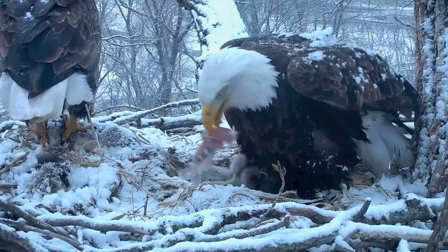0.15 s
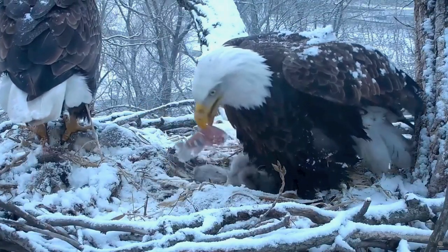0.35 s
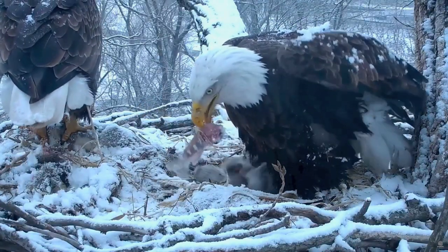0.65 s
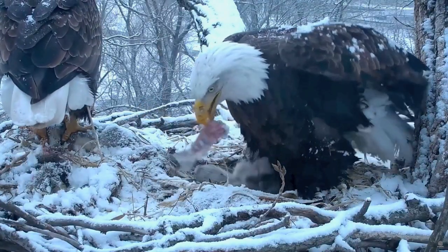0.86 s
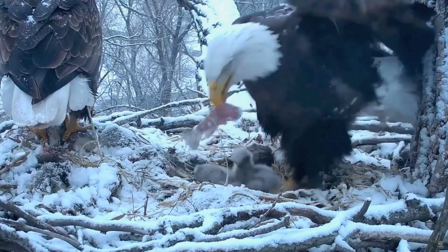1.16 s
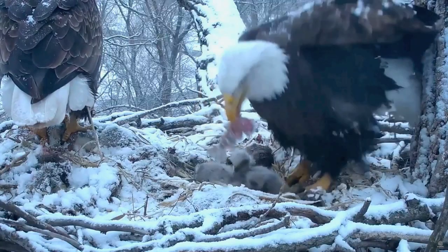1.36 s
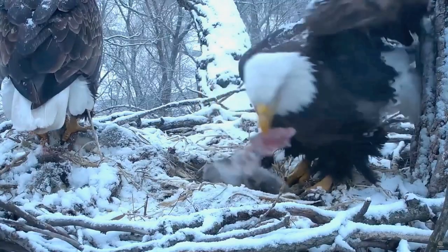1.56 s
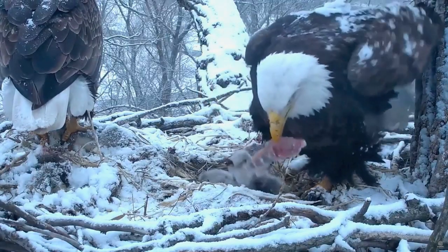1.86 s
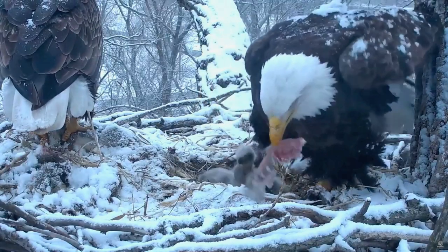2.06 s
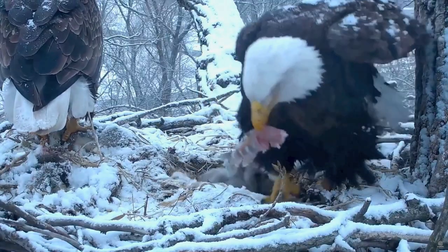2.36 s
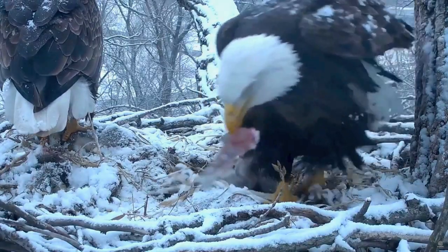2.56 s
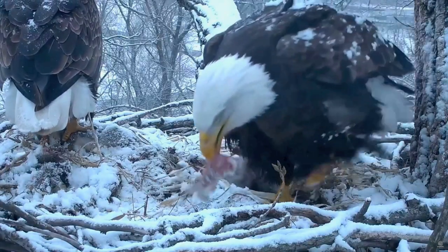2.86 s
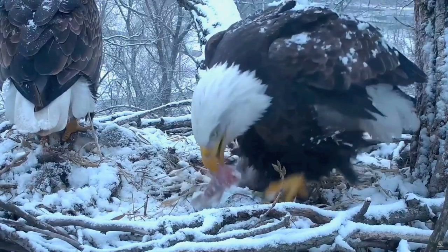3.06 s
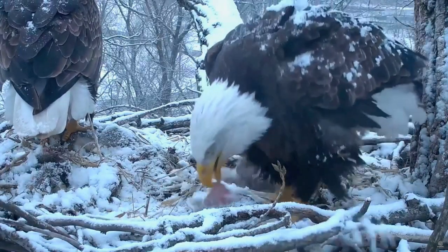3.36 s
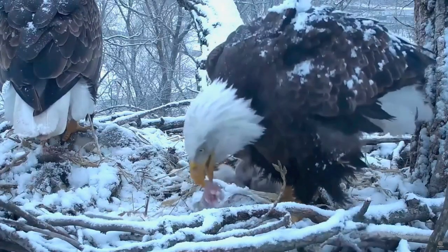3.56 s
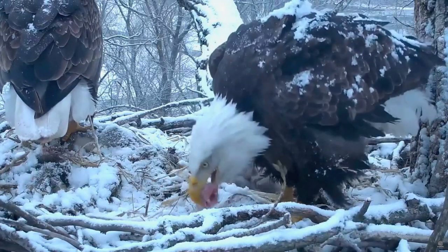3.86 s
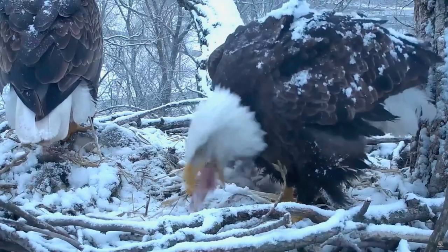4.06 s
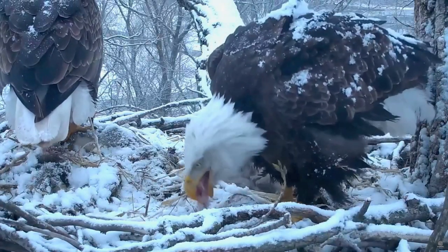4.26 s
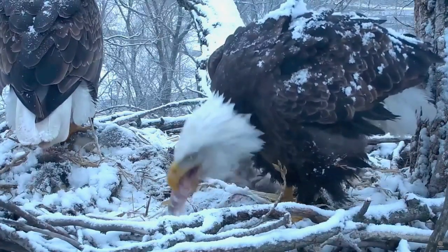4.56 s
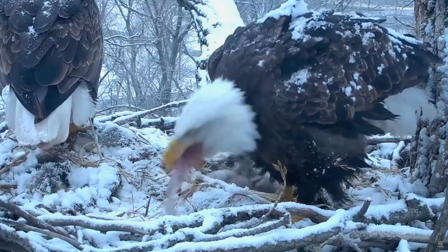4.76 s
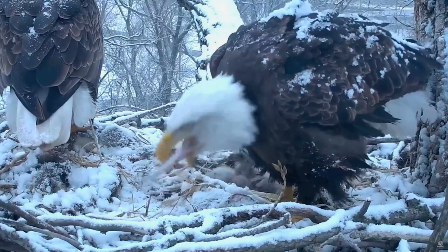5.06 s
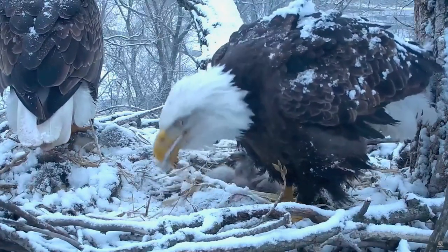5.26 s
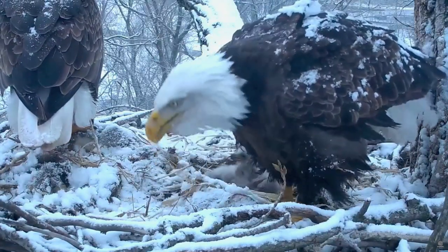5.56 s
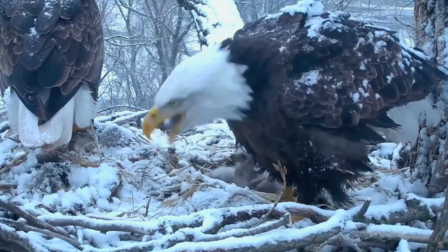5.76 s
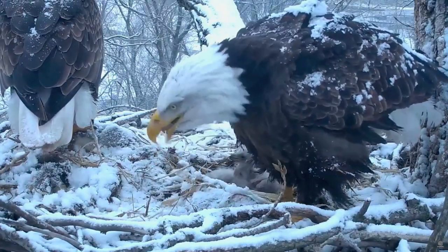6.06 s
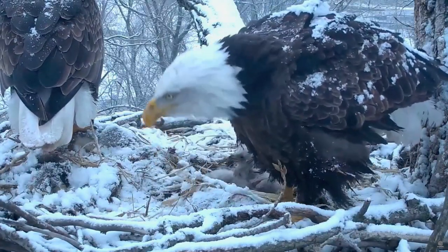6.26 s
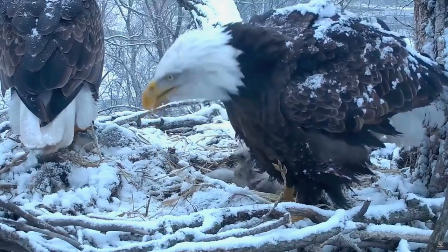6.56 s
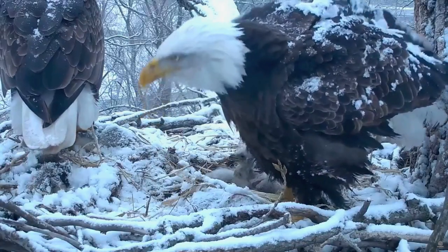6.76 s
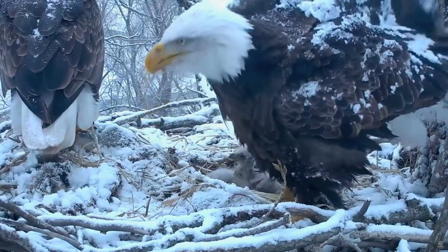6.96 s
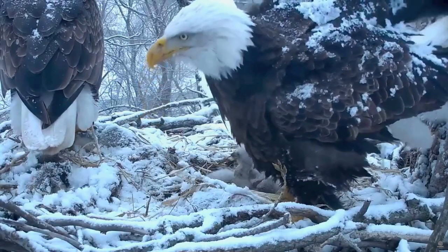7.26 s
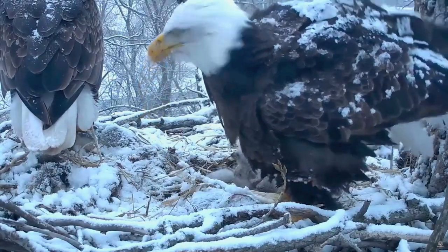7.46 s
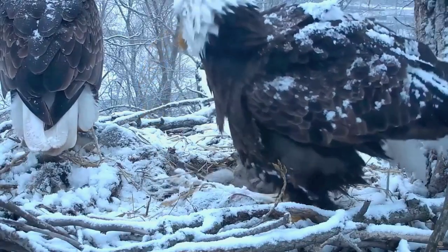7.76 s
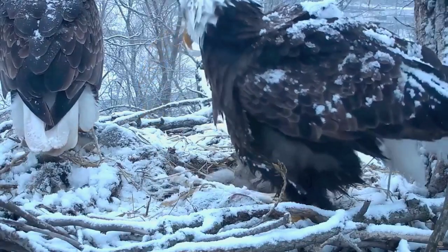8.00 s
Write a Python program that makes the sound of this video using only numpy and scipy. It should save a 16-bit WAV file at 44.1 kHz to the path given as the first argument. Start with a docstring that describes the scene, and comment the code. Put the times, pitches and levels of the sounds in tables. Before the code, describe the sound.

At an outdoor eagle nest, a run of faint thin peeps leads into a loud chitter of sharp, high chirps. Sticks and straw rustle softly as an adult steps about and tugs at food, among scattered chirps and short squeals. The nest quietens, then chirps and rustling pick up at the end. A small, close microphone adds a low hum and hollow hiss throughout.

```python
"""Bald eagles at a snowy nest, heard from close by through a small outdoor camera microphone.
A run of thin peeps comes first, then a loud chitter of sharp chips. An adult steps over the sticks and
tears food among scattered chips and squeals; the nest quietens, and chips and rustle pick up at the end.
All along the microphone adds mains hum and a hollow hiss; its 8 kHz sampling mirrors calls about 4 kHz."""
import sys
import numpy as np
from scipy import signal
from scipy.fft import rfft, irfft, next_fast_len
from scipy.io import wavfile
from scipy.ndimage import uniform_filter1d

SR = 44100
rng = np.random.default_rng(int(sys.argv[2]) if len(sys.argv) > 2 else 0)


def master(y):
    """Save y as 16-bit WAV."""
    cut = np.clip(np.atleast_2d(y).T, -1, 1)
    pcm = np.round(cut * 32767)  # scale
    wavfile.write(sys.argv[1], SR, pcm.astype(np.int16))


N = 358533
TIME = np.arange(N) / SR

# sharp chips: (peak time [s], relative level [dB], swell [s], closing pitch [Hz])
CHIPS = [ (0.7282, -24, 0.0042, 2940), (0.8205, -20.5, 0.0036, 3066), (0.9220, -22, 0.008, 3050),
         (1.0291, -21.5, 0.0068, 3134), (1.1222, -23, 0.0052, 3226), (1.2246, -27.5, 0.0063, 3250),
         (1.31, -37.5, 0.0059, 3245), (1.7597, -25, .0014, 2900), (1.9625, -31, 0.0016, 2860),
         (1.9856, -37.5, 0.0031, 3420), (2.2440, -28.5, 0.0025, 3005), (2.4152, -25.5, 0.005, 3150),
         (3.7620, -52.5, 0.0022, 5020), (4.031, -47.5, 0.0021, 3300), (4.1370, -51, 0.0028, 4790),
         (4.5200, -36.5, 0.004, 3000), (4.7286, -22, .0018, 3084), (4.7322, -30, 0.0029, 2200),
         (4.752, -35, 0.0018, 3170), (5.4590, -43, .0020, 2930), (6.1627, -35.5, .0018, 2980),
         (7.5010, -33.5, .0024, 3030), (7.6674, -31, 0.0023, 3000), (7.7590, -47, 0.0023, 3100),
         (7.814, -32.5, 0.0032, 2940), (7.9586, -32.5, 0.0045, 2930)]
# held squeals: (start [s], length [s], relative level [dB], pitch [Hz], glide [Hz], roughness [0-1])
SQUEALS = [ (.015, 0.049, -54, 4940, 0, 0.4), (.507, 0.028, -51.5, 3490, -120, 0.33),
           (.623, 0.041, -48.5, 3260, -320, 0.23), (1.003, .010, -37.5, 3290, -140, .38),
           (1.193, .028, -40, 3355, 306, .86), (1.880, 0.032, -44.5, 3180, 100, 0.53),
           (1.883, 0.016, -43.5, 1886, -30, 0.2), (1.991, 0.067, -48.5, 3090, 4, 0.45),
           (2.059, .03, -45, 3100, -450, 0.78), (2.36, 0.037, -51, 3020, 27, .54),
           (2.602, 0.034, -53.5, 5210, -160, 0.43), (2.798, 0.049, -53, 4910, 7, 0.12),
           (2.868, .035, -58, 5190, -130, 0.2), (4.32, 0.037, -62, 4840, -110, .2),
           (4.551, 0.013, -59.5, 3850, 220, 0.5), (4.58, .04, -60, 4700, 83, 0.1),
           (5.193, 0.036, -52, 2517, -140, 0.23), (5.457, 0.021, -47.5, 3080, 2, .28),
           (6.151, 0.034, -42.5, 3116, -110, 0.33), (6.497, 0.012, -41.5, 3060, -60, .3),
           (6.528, .013, -61, 3860, -350, .3), (7.042, .03, -51.5, 3110, 17, .12),
           (7.692, 0.039, -55, 3170, -17, 0.53), (7.812, 0.014, -45.5, 3238, -300, 0.82),
           (7.959, .045, -54.5, 3150, 90, 0.54), (8.053, 0.037, -58, 3200, 25, .58)]
# steps and tugs at the food: (peak time [s], level [dB], rise [s], fall [s])
MOVEMENTS = [ (1.2, -61.5, .22, 0.13), (2.08, -56, 0.19, .38), (3.12, -63.5, 0.12, 0.1),
             (3.38, -59, 0.026, 0.032), (4.1, -69.5, 0.11, 0.083), (4.82, -81, .08, .15),
             (5.38, -72.5, 0.068, 0.22), (7.73, -61, .1, 0.067), (8.13, -66.5, 0.16, .2)]
# colour of the rustling sticks: (frequency [Hz], gain [dB])
STICK_COLOUR = [(1300, -9), (2000, 1), (2600, -1.5), (3100, 3.5), (3550, 1), (3950, -22), (4400, -31.5)]
# swell of the background air: (time [s], relative level [dB])
AIR_LEVEL = [(0.0, -56.5), (0.54, -59.5), (0.74, -56.5), (0.9, -56.5), (1.33, -55.5), (1.61, -58.5),
             (1.74, -58.5), (2.06, -56), (2.76, -58.5), (3.01, -58), (3.78, -63), (4.71, -60), (5.46, -60),
             (5.86, -64), (6.43, -61.5), (7.4, -62.5), (7.83, -58), (8.13, -59.5)]
# four bands of air and microphone noise, low to high: (frequency [Hz], gain [dB])
RUMBLE_COLOUR = [(15, -68), (25, -39), (64, -17), (92, -21), (125, -10), (172, -3), (213, -13.5),
                 (243, -0.5), (289, 2), (309, 2), (339, -22), (377, -6.5), (425, -13), (498, -22.5),
                 (600, -24.5), (780, -50), (1320, -120)]
HOLLOW_COLOUR = [(330, -42.5), (560, -5.5), (601, -21.5), (638, 2), (672, 9), (753, 3.5), (824, -6.5),
                 (921, 0), (1020, -22.5), (1200, -6), (1560, -51.5), (2640, -120)]
HISS_COLOUR = [(650, -53.5), (1100, -22.5), (1210, -14), (1290, -10), (1570, -1), (1680, -8), (2120, -10.5),
               (2320, -23.5), (2930, -18), (4200, -38), (5460, -76), (9240, -120)]
TREBLE_COLOUR = [(3500, -26), (5500, -2), (7000, -4.5), (10000, -7), (14000, -11.5)]
# mains harmonics: (frequency [Hz], rms level [dB])
MAINS_HARMONICS = [(120, -91), (180, -78.5), (300, -80), (420, -94), (660, -85), (780, -89), (900, -95)]
# peaks and notches of the microphone housing: (frequency [Hz], width [Hz], gain [dB])
HOUSING_MODES = [(1198, 95, -15.5), (1323, 36, 4), (1597, 35.6, 8.5), (1641, 22, -14.5), (1728, 35, 6.5),
                 (1814, 41, -20), (1872, 18, 8), (1988, 30, -11), (2214, 123, -14), (2465, 25.5, 9.5),
                 (2548, 123, -18), (2630, 27, -6), (2932, 24, 6.5), (3014, 26, -8), (3164, 38, 4),
                 (3313, 47, -5.5), (3200, 59, 3), (3637, 27, 10.5), (3670, 59, -4.5), (3830, 90, 6.5),
                 (4640, 55, 5)]
# strength of the sampling images, which dips once: (time [s], gain [dB])
IMAGE_LEVEL = [(0, -1), (.7, .5), (6.2, -1.5), (6.48, -5), (7.05, -3), (7.5, -2)]
# how much of the images gets out around 4 kHz and around 12 kHz: (frequency [Hz], gain [dB])
LOW_IMAGE_COLOUR = [(1500, -31), (2500, 9), (3050, -4), (3600, 1), (4200, -9), (4700, 1), (5000, -4),
                    (5500, -3), (6000, -30), (6500, -38.5)]
HIGH_IMAGE_COLOUR = [(10400, -36), (11000, -22.5), (11300, -28), (11850, -47), (12450, -24), (12850, -31),
                     (13500, -47)]


def chips(stop_s=0.0019, slide_hz=878, slide_swell_s=0.00523, jitter_hz=70, flutter_db=1.4):
    """Each chip starts abruptly, swells while its pitch slides down, then is choked off in milliseconds."""
    out, waver, flutter = np.zeros(N), drift(500), drift(400)
    for peak_s, db, swell_s, close_hz in CHIPS:
        t = np.arange(-2 * swell_s, 5 * stop_s, 1 / SR)
        now = int(peak_s * SR) + np.arange(len(t))
        onset = np.sin(np.pi / 2 * np.interp(t / swell_s, [-1.7, -.85], [0, 1])) ** 2
        envelope = onset / np.cosh(2 * t / np.where(t < 0, swell_s, stop_s))
        open_hz = close_hz + slide_hz * np.tanh(swell_s / slide_swell_s)   # longer swells fall further
        slide = np.interp(t, [-1.1 * swell_s, 0.44 * stop_s], [open_hz, close_hz])
        tone = whistle(slide + jitter_hz * waver[now])
        add(out, peak_s + t[0], from_db(db + flutter_db * flutter[now]) * envelope * tone)
    return out


def squeals(notes, jitter_hz=280, flutter_db=3.5):
    """Held whistles; in the hoarse ones the syrinx shakes in both pitch and strength."""
    out, waver, flutter = np.zeros(N), drift(215), drift(220)
    for start_s, length_s, db, hz, glide_hz, rough in notes:
        now = slice(int(start_s * SR), min(int((start_s + length_s) * SR), N))
        along = np.linspace(0, 1, now.stop - now.start)
        arch = np.abs(np.sin(np.pi * along)) ** np.clip(1 - rough, .3, 1)
        pitch = hz + glide_hz * along + rough * jitter_hz * waver[now]
        out[now] += arch * from_db(db + rough * flutter_db * flutter[now]) * whistle(pitch)
    return out


def rasp_notes(lead_s=.035, length_s=.034, rise_hz=278.6, rough=.7, min_gap_s=.06, max_gap_s=.12):
    """In a chitter, a softer, hoarse rising rasp leads into each chip that closely follows another."""
    return [(s - lead_s, length_s, db - 20, hz + 130, rise_hz, rough)
            for previous, (s, db, _, hz) in zip(CHIPS, CHIPS[1:])
            if min_gap_s < s - previous[0] < max_gap_s]


def peep_notes(first_s=.083, gap_s=.093, slowing_s=.005, length_s=.02, hz=4887, rise_hz=141, rough=.27):
    """Six thin, quiet peeps of one shape, in a run that slows a little."""
    k = np.arange(6)
    starts = first_s + k * gap_s + k * (k - 1) / 2 * slowing_s
    return [(s, length_s, -52, hz, rise_hz, rough) for s in starts]


def nest_echoes(calls, near_db=-9.5, near_t60=0.038, far_db=-10.5, far_t60=0.16):
    """Sticks and trunk scatter the calls at once; trees farther off return a faint longer tail."""
    t = TIME[:SR // 2]
    response = np.zeros(len(t))
    response[0] = 1   # straight path to the microphone
    for db, t60, first_s in [(near_db, near_t60, .002), (far_db, far_t60, .014)]:
        echoes = rng.standard_normal(len(t)) * from_db(-60 * t / t60) * (t > first_s)
        response += from_db(db) * echoes / np.linalg.norm(echoes)
    return signal.fftconvolve(calls, response)[:N]


def stirring(rest_db=-77.5):
    """Each step or tug builds and settles exponentially, adding power to straw that is never quite still."""
    moves = [from_db(db) * np.exp(-np.maximum((s - TIME) / rise_s, (TIME - s) / fall_s))
             for s, db, rise_s, fall_s in MOVEMENTS]
    return np.sqrt(from_db(rest_db) ** 2 + np.sum(np.square(moves), axis=0))


def rustle(crackles_per_s=6000, clump_db=4.0, twigs_per_s=120, twig_db=-12.5):
    """Dry straw gives way in a dense, soft crackle, with single twigs ticking out of it."""
    straw = rng.standard_normal(N) * (rng.random(N) < crackles_per_s / SR)
    straw *= from_db(clump_db * drift(19))
    twigs = rng.uniform(-0.99, 1, N) * (rng.random(N) < twigs_per_s / SR)
    crackle = rms_one(straw) + from_db(twig_db) * rms_one(twigs)
    return stirring() * rms_one(coloured(crackle, STICK_COLOUR))


def air(low_db=-67.3, hollow_db=-9.5, hiss_db=-1.0, treble_db=-25.0):
    """Outdoor air and microphone noise swell and sink together, the lows and the top less than the hiss."""
    air_db, = in_time(AIR_LEVEL)
    swing_db = air_db - air_db.mean()
    low = noise(RUMBLE_COLOUR) + from_db(hollow_db) * noise(HOLLOW_COLOUR)
    low *= from_db(low_db + 0.84 * swing_db)
    hiss = from_db(air_db + hiss_db) * noise(HISS_COLOUR)
    treble = from_db(air_db.mean() + 0.76 * swing_db + treble_db) * noise(TREBLE_COLOUR)
    return low + hiss + treble


def mains_hum():
    """The microphone picks up steady harmonics of the 60 Hz mains."""
    return sum(from_db(db) * np.sqrt(2) * np.sin(2 * np.pi * (hz * TIME + rng.random()))
               for hz, db in MAINS_HARMONICS)


def housing(x):
    """The small cavity in front of the microphone rings at some pitches and swallows others."""
    for hz, width_hz, db in HOUSING_MODES:
        x = x + (from_db(db) - 1) * resonate(x, hz, width_hz)
    return x


def from_db(db):
    """Decibels to gain."""
    return 10 ** (np.asarray(db) / 20)


def rms_one(x):
    """Scale to unit rms."""
    return x / np.sqrt(np.mean(x ** 2) + 1e-20)


def in_time(rows):
    """Each column of a curve at every sample."""
    s, *columns = np.transpose(rows)
    return [np.interp(TIME, s, column) for column in columns]


def add(out, start_s, sound):
    """Mix a sound in at a given time."""
    at = max(int(start_s * SR), 0)
    out[at:at + len(sound)] += sound[:max(N - at, 0)]


def coloured(x, colour):
    """Filter by a (frequency [Hz], gain [dB]) outline that falls away steeply beyond its ends."""
    size = next_fast_len(N)
    log_hz = np.log(np.maximum(np.fft.rfftfreq(size, 1 / SR), 1))
    hz, db = np.transpose(colour)
    beyond = np.abs(log_hz - np.clip(log_hz, np.log(hz[0]), np.log(hz[-1])))
    gain = from_db(np.interp(log_hz, np.log(hz), db) - 120 * beyond)
    return irfft(rfft(x, size) * gain, size)[:N]


def noise(colour):
    """Unit-rms noise of a given colour."""
    return rms_one(coloured(rng.standard_normal(N), colour))


def resonate(x, hz, width_hz):
    """A two-pole resonance."""
    r = np.exp(-np.pi * width_hz / SR)
    feedback = [1, -2 * r * np.cos(2 * np.pi * hz / SR), r * r]
    return signal.lfilter([1, 0, -1], feedback, x) * (1 - r * r) / 2


def drift(rate_hz):
    """Smooth random wandering of unit rms."""
    r = np.exp(-2 * np.pi * rate_hz / SR)
    return rms_one(signal.lfilter([1], [1, -2 * r, r * r], rng.standard_normal(N + SR))[SR:])


def whistle(hz):
    """A pure tone that follows a pitch track."""
    return np.sin(2 * np.pi * np.cumsum(hz) / SR)


def scene(chip_db=-2.5, squeal_db=-2.0):
    """Calls and rustle in the nest over air and hum, all heard in mono through the microphone housing."""
    calls = from_db(chip_db) * chips()
    calls += from_db(squeal_db) * squeals(SQUEALS + rasp_notes() + peep_notes())
    return housing(nest_echoes(calls) + rustle() + air() + mains_hum())[None]


def record(dry, sampling_hz=8000, cutoff_hz=14700, loud_db=-25.5, growth=0.56):
    """The camera's poorly filtered sampling mirrors the sound about multiples of its rate; the top is cut."""
    phase = 2 * np.pi * sampling_hz * TIME
    image_db, = in_time(IMAGE_LEVEL)
    mirrored = from_db(image_db) * dry[0] * 2 * (np.cos(phase) + np.cos(2 * phase))
    low_images = coloured(mirrored, LOW_IMAGE_COLOUR)
    # the highest images stand out most on loud peaks
    running_rms = np.sqrt(np.abs(uniform_filter1d(dry[0] ** 2, size=90)))
    loudness = np.clip(running_rms / from_db(loud_db), 1e-6, 1)
    high_images = coloured(mirrored * loudness ** growth, HIGH_IMAGE_COLOUR)
    lowpass = signal.ellip(10, .1, 70, cutoff_hz, fs=SR, output="sos")
    return signal.sosfilt(lowpass, dry + low_images + high_images)


dry = scene()
out = record(dry)
master(out)
```